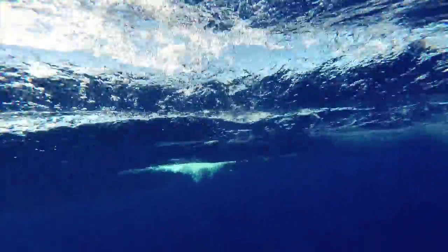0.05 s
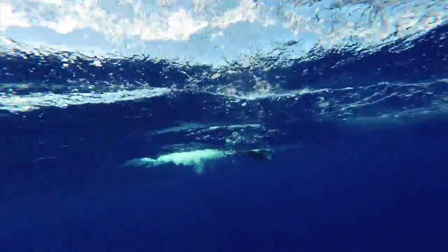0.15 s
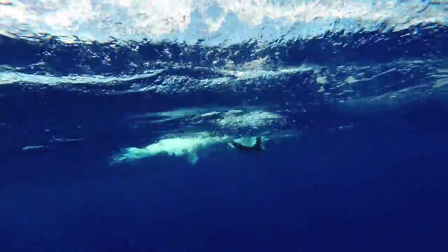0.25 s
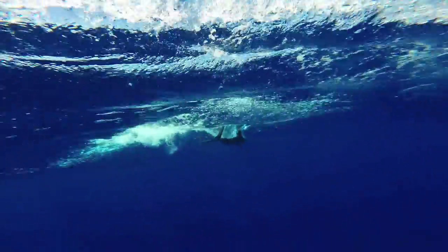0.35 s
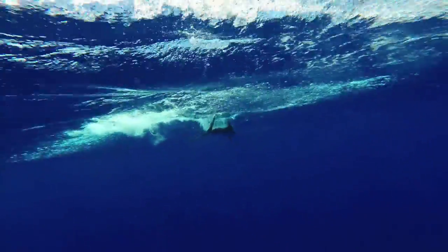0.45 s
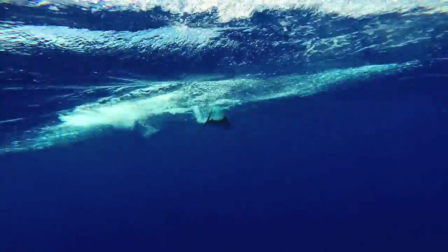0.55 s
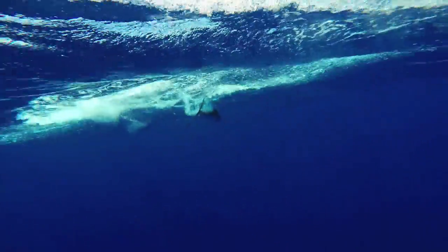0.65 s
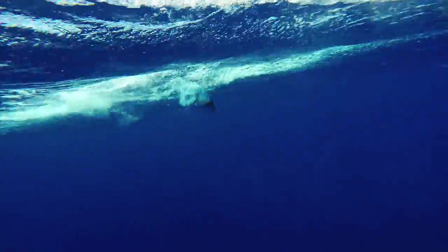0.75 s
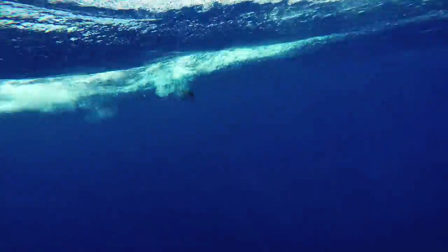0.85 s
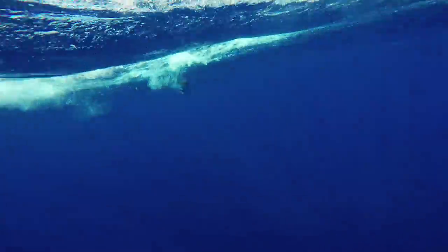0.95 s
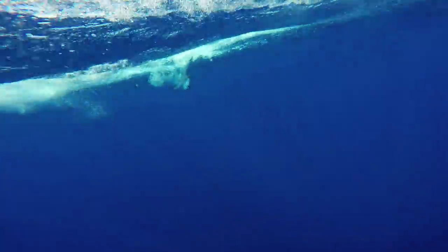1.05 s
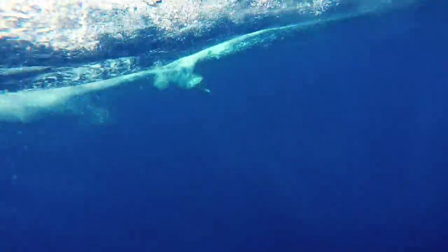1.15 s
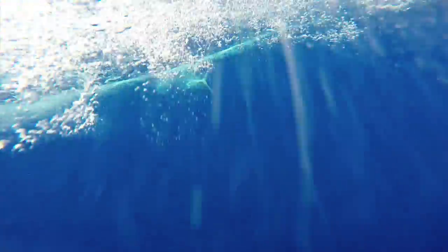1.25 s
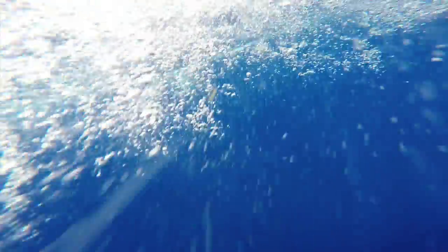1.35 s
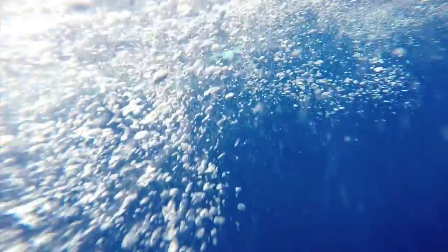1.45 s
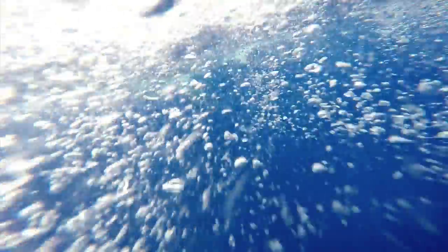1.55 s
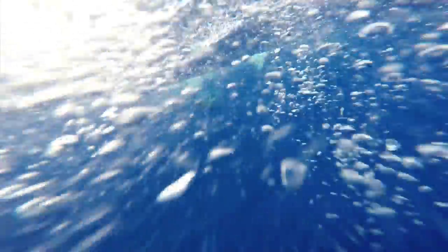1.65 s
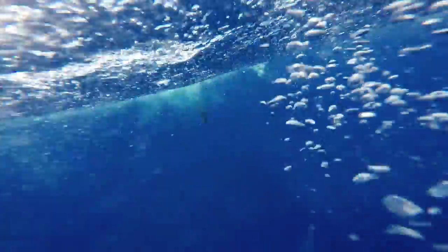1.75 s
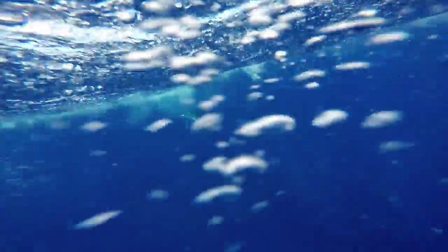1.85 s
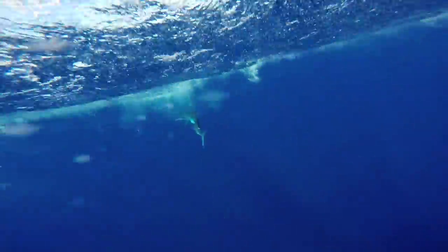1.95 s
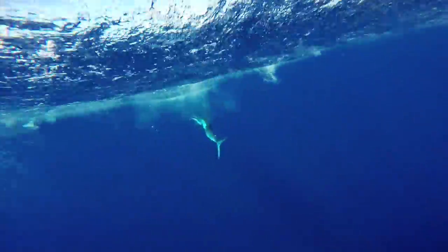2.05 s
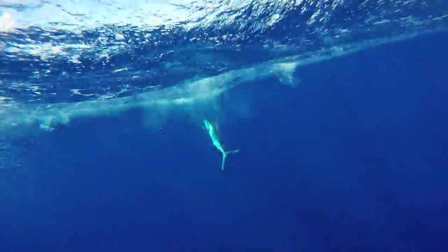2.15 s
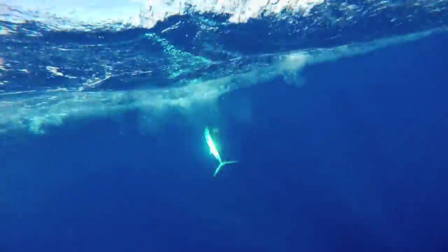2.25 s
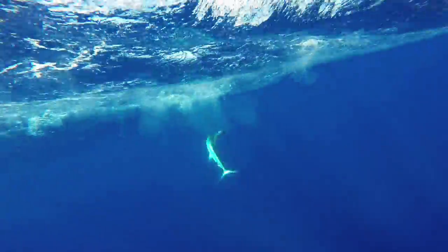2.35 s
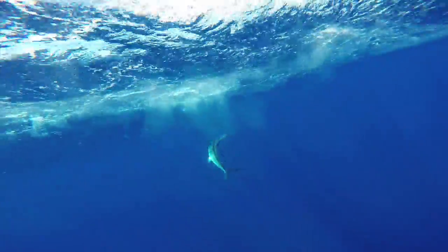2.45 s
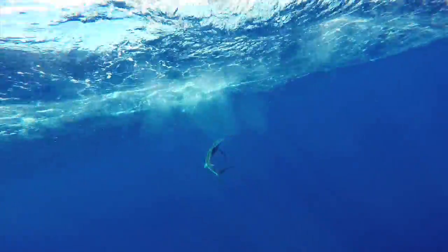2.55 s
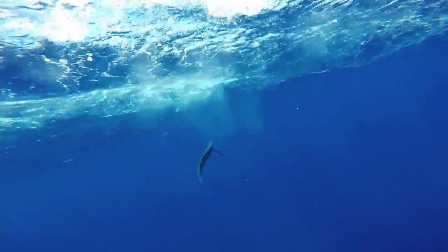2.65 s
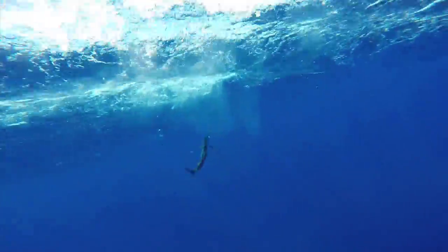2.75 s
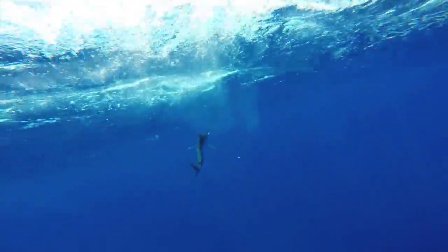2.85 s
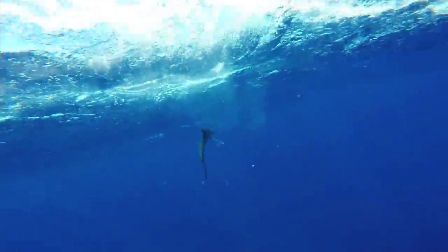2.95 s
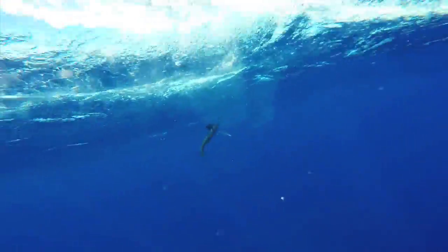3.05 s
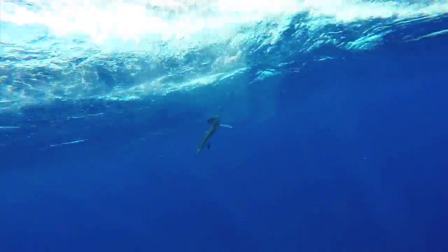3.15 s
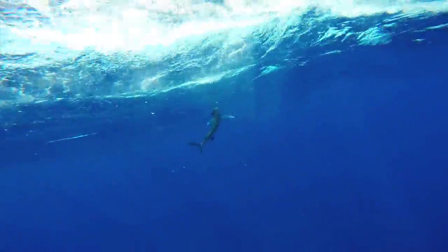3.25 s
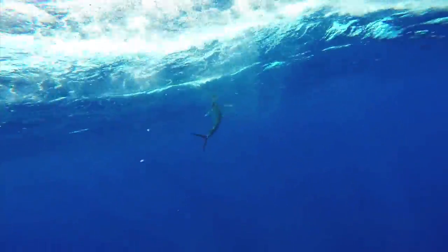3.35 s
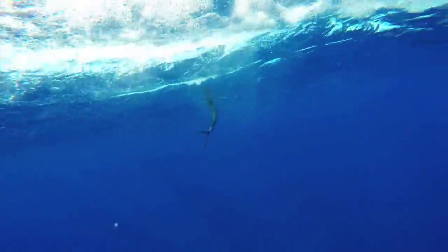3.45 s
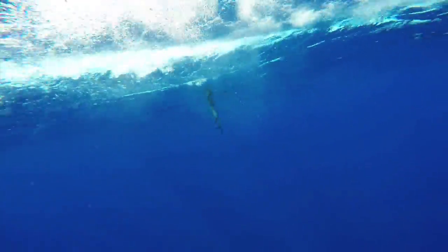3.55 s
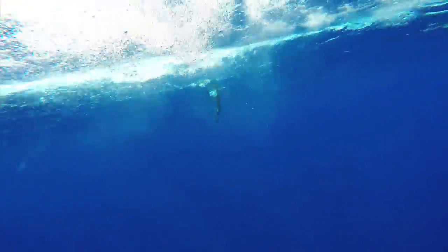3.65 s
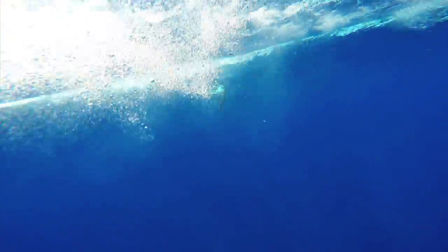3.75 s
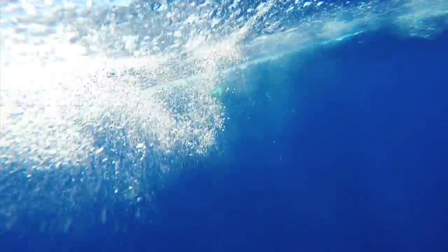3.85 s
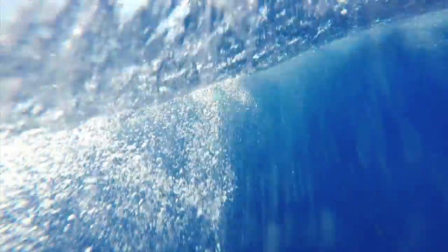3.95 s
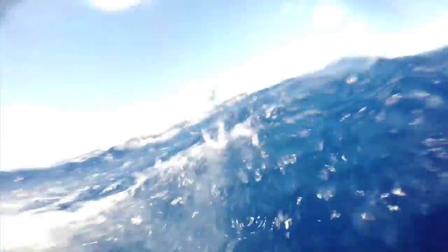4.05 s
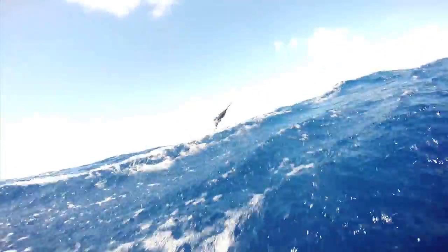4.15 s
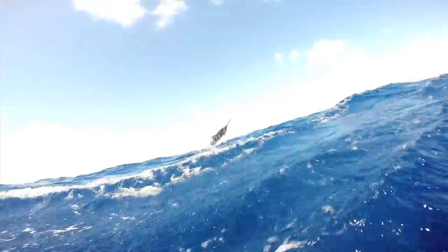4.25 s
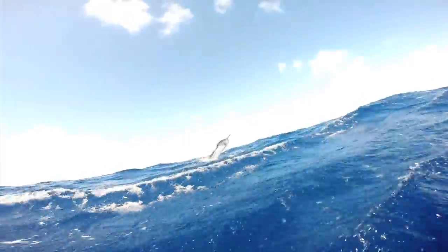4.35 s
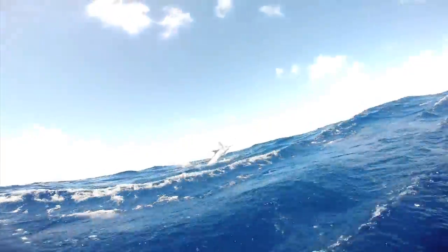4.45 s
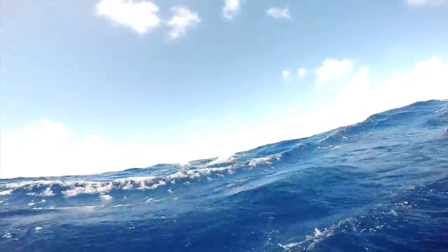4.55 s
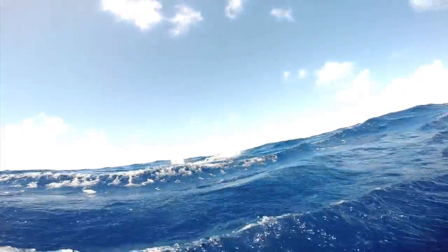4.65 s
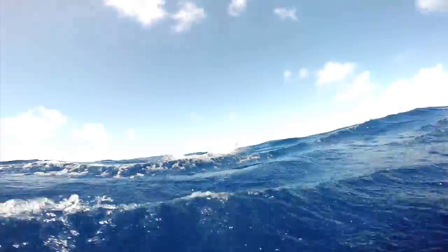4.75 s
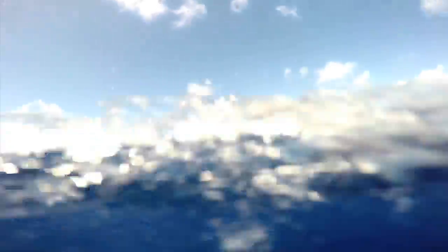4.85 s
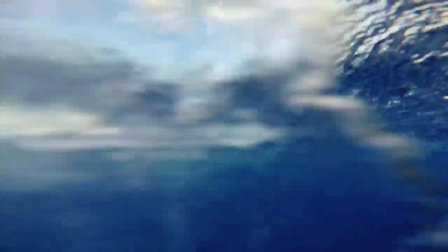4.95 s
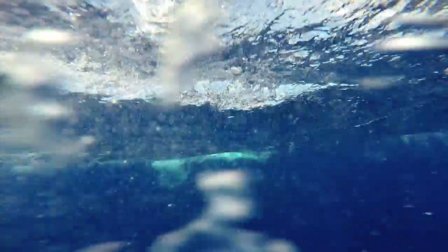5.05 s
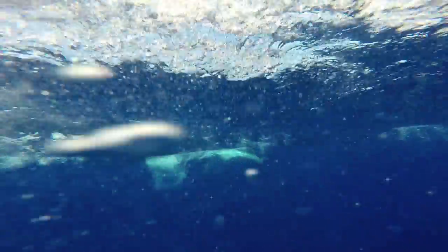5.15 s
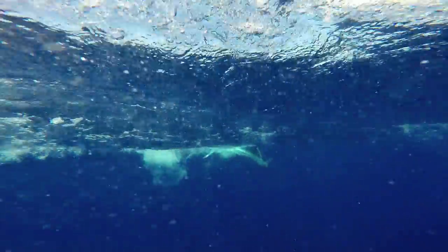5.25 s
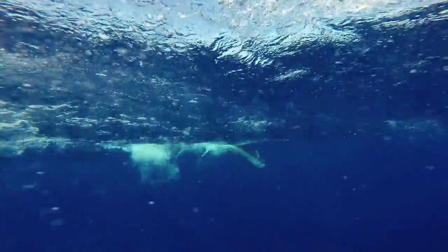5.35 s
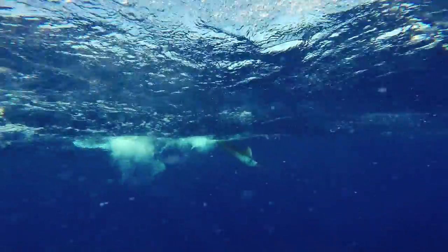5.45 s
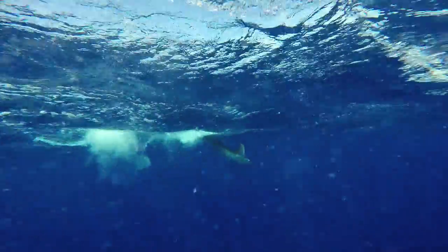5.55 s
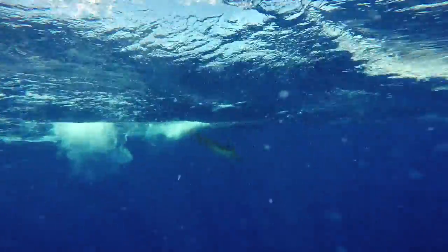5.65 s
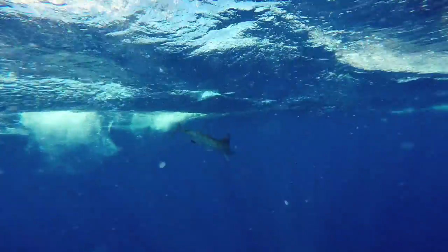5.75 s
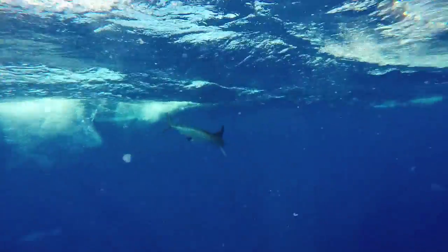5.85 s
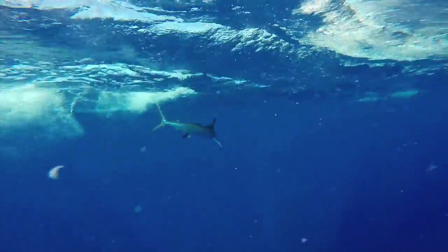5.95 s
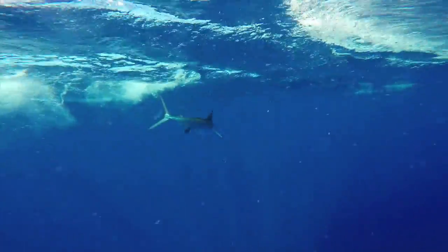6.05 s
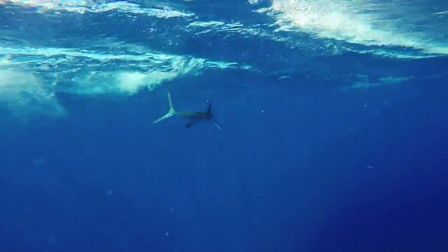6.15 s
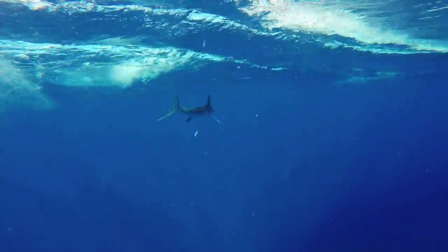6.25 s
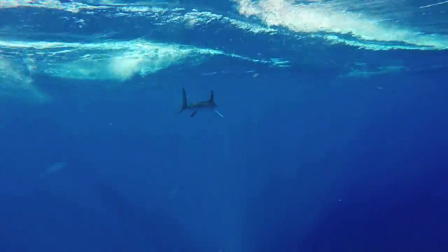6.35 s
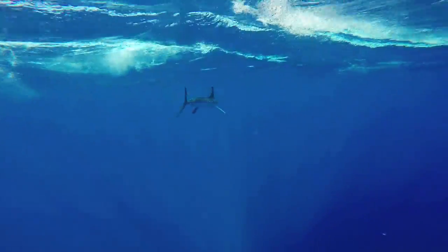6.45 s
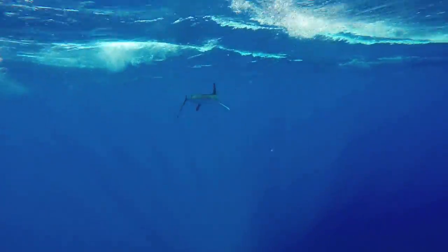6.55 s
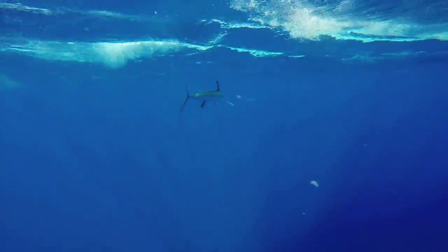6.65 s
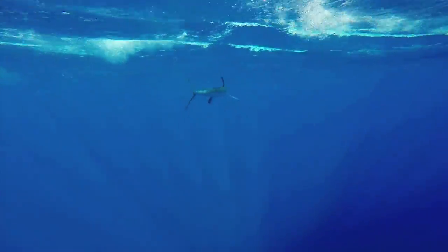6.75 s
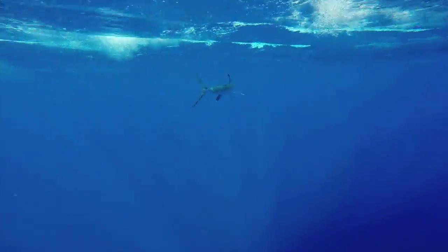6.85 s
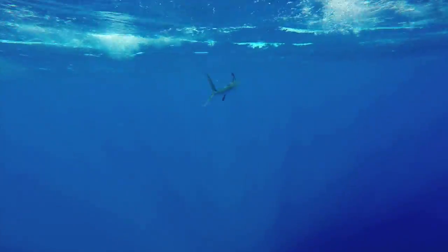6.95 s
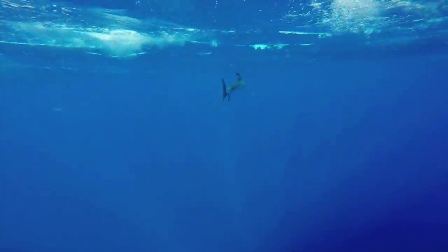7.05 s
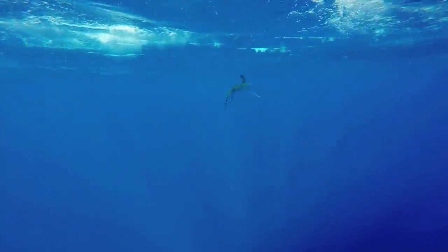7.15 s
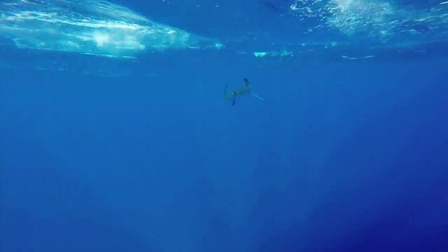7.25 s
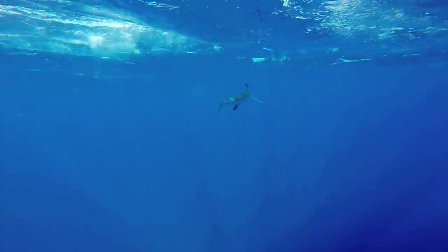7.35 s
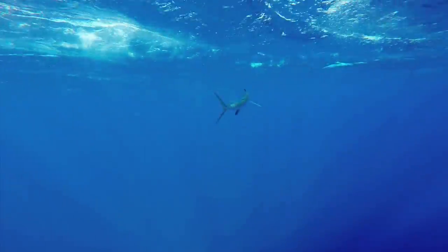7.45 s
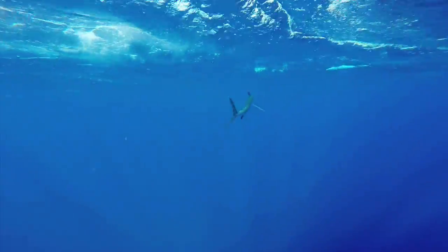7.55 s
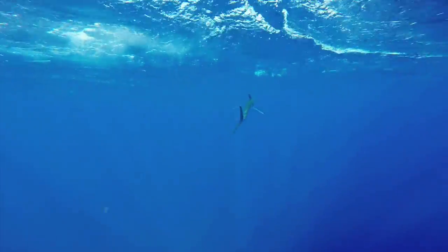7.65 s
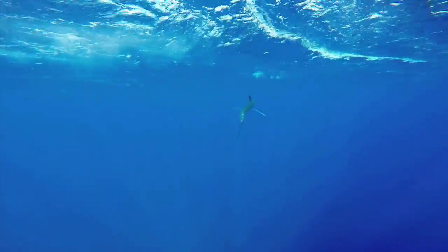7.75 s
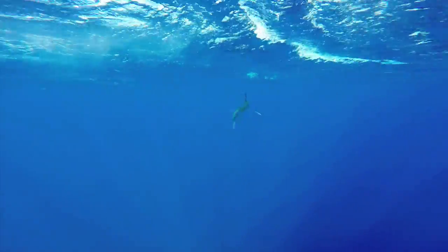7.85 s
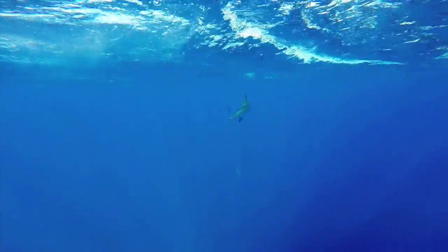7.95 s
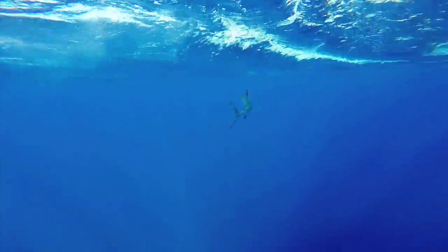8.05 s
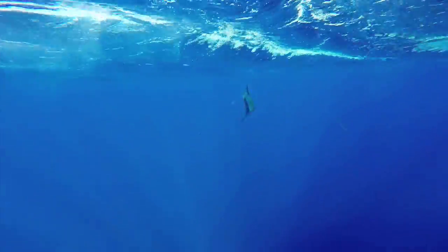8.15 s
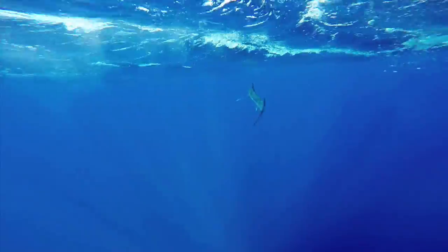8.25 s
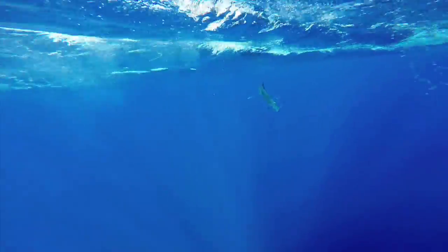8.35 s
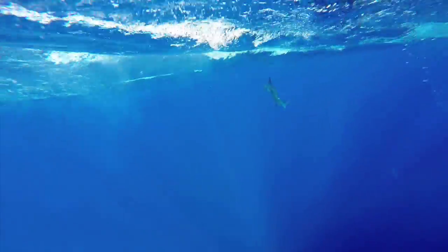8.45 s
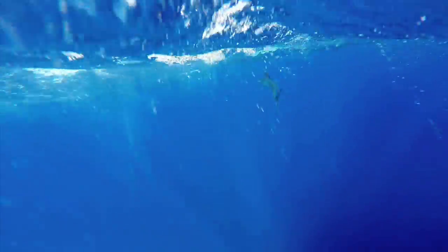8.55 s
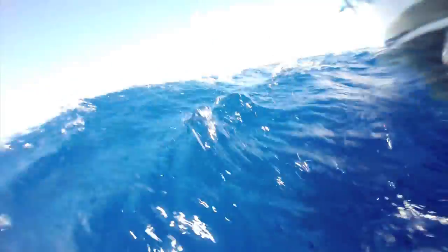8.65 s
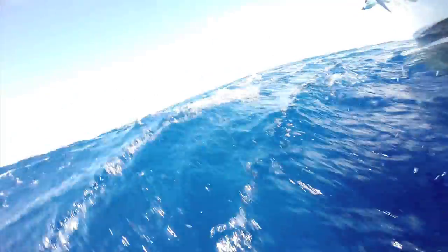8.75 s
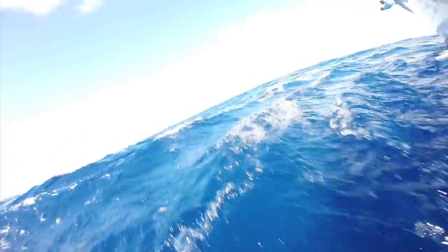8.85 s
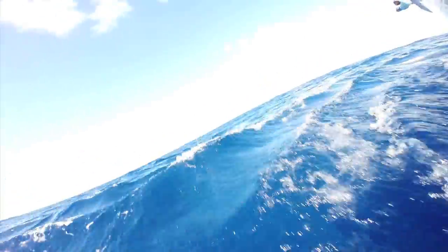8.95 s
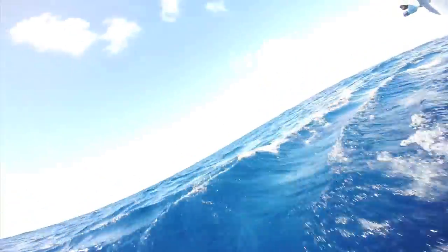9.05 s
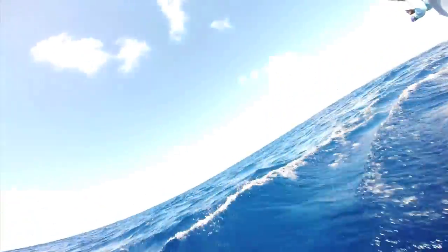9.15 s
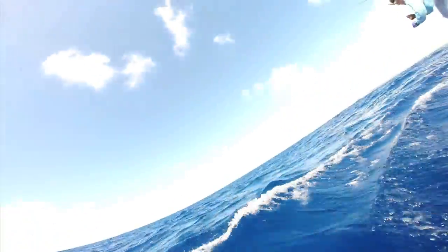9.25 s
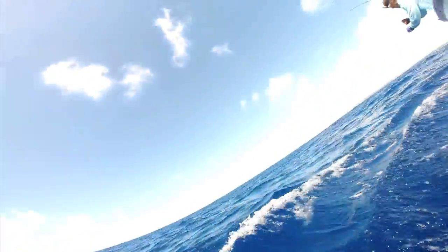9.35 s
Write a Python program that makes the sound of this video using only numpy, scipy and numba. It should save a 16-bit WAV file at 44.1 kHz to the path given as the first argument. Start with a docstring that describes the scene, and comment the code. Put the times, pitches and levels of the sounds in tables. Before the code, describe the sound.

Muffled seawater gurgles and bubbles around a sealed underwater microphone, sharp splashes break as it surfaces, then a long rushing wash stops abruptly.

```python
"""The wake of a boat rushes through the wall of a sealed camera housing dragged in the sea: filtered noise.
Bubble clouds and single bubbles gurgle and tick as damped tones; flow and hull rumble as low noise.
At the surface splashes swell and drain, and the microphone port snaps and rings under slaps of water.
The housing comes out twice, the second time for good: hiss and low rumble stay, at the end with the
engine, a set of wavering harmonics. The microphone hisses throughout."""
import sys
import numpy as np
from scipy import signal
from scipy.fft import rfft, irfft
from scipy.io import wavfile
from scipy.ndimage import uniform_filter1d
from numba import njit

SR = 44100
rng = np.random.default_rng(int(sys.argv[2]) if len(sys.argv) > 2 else 0)


def elevation(decibels):
    """Turn decibel levels (scalar or array-like) into linear amplitude ratios."""
    levels = np.asarray(decibels, float)
    return 10 ** (levels / 20)


def master(y):
    """Save y as 16-bit WAV."""
    cut = np.clip(np.atleast_2d(y).T, -1, 1)
    pcm = np.round(cut * 32767)  # scale
    wavfile.write(sys.argv[1], SR, pcm.astype(np.int16))


N = 415422
TIME = np.arange(N) / SR  # seconds
GRID_HZ = np.arange(N // 2 + 1) * SR / N + 1  # spectrum grid, 1 Hz up to keep its logarithm finite


def colour(points, bells=()):
    """Linear filtering: gain over frequency from (Hz, dB) points plus resonance bells (Hz, width Hz, dB)."""
    point_hz, point_db = np.array(points).T
    db = np.interp(np.log(GRID_HZ), np.log(point_hz), point_db)
    for centre_hz, width_hz, bell_db in bells:
        db = db + bell_db / (1 + ((GRID_HZ - centre_hz) / (width_hz / 2)) ** 2)
    return elevation(db)


def unit(x):
    """Normalisation of power: scales a signal to rms 1."""
    return x / np.sqrt(np.mean(x ** 2))


def coloured_noise(points, bells=()):
    """Spectral shaping: white noise through a fixed gain curve, at rms 1."""
    return unit(irfft(rfft(rng.standard_normal(N)) * colour(points, bells), N))


def read(curves, column, rest):
    """Piecewise-linear envelope: one column of several curves over time, and the value rest outside them."""
    out = np.full(N, float(rest))
    for rows in map(np.array, curves):
        on = (TIME >= rows[0, 0]) & (TIME <= rows[-1, 0])
        out[on] = np.interp(TIME[on], rows[:, 0], rows[:, column])
    return out


def walk(rate):
    """Random modulation: a new independent level rate times a second, joined by ramps, at rms 1."""
    hold = int(SR / rate)
    steps = np.repeat(rng.standard_normal(N // hold + 1), hold)
    return unit(uniform_filter1d(steps, hold)[:N])


@njit
def ring(n, sr, start, hz, t60, size, rise, glide):
    """Damped oscillation: tones that swell over rise cycles and die in t60 s, pitch climbing by share glide."""
    out = np.zeros(n)
    for s, f, d, a in zip(start, hz, t60, size):
        steps, phase, i0 = int(d * sr), 0., int(s * sr)
        for i in range(min(steps, n - i0)):
            phase += 2 * np.pi * f * (1 + glide * i / steps) / sr
            swell = 1 - np.exp(-i * f / (rise * sr))
            out[i0 + i] += a * np.sin(phase) * 10 ** (-3 * i / steps) * swell
    return out


# Spectrum of the microphone's own noise. Each row: frequency in Hz, relative density in dB.
MIC_COLOUR = [(4000, -40), (7000, -2), (10500, 0.3), (12000, -3), (13000, -11), (15500, -22)]


def mic_hiss():
    """Stationary noise: the steady treble hiss of the microphone, at -79 dB rms."""
    return coloured_noise(MIC_COLOUR) * elevation(-79)


# Harmonics of the idling boat. Each row: frequency in Hz, level in dB before the shared gain of 4 dB.
ENGINE_HARMONICS = [(22.2, -56), (44.4, -53), (88.8, -49.5), (111, -52), (133, -57)]


def engine():
    """Harmonic series: firing harmonics heard through air share one wavering pitch; each level wavers alone."""
    pitch = 1 + 0.01004 * walk(3.06)
    turn = 2 * np.pi * np.cumsum(pitch) / SR
    hum = sum(elevation(db + 4 + 2.2 * walk(17)) * np.sin(hz * turn) for hz, db in ENGINE_HARMONICS)
    return hum * np.clip((TIME - 8.72) / .05, 0, 1)  # enters at 8.72 s


# Spectrum of the hiss above water. Each row: frequency in Hz, relative density in dB.
AIR_COLOUR = [(130, -39.5), (220, 1), (1010, -5), (1540, -1), (1830, -1.5), (2270, -5.5), (3990, -14.5),
              (5680, -15), (8990, -27.5), (12800, -34.5), (15000, -49)]
# Resonances of the dry housing. Each row: frequency in Hz, width in Hz, height in dB.
CASE_RESONANCES = [(1530, 340, 3), (2250, 230, 5.5), (3600, 300, 4.5), (5140, 400, 3.5), (1970, 130, -4),
                   (4400, 250, -1)]
# Spells out of the water. Each row: start in seconds, end in seconds, settled hiss in dB before its wander.
SURFACED = [(4.12, 4.88, -49.5), (8.72, 9.425, -54.5)]


def air():
    """Resonant filtering of noise: faint sea and wind hiss, its level settling as the lid drains."""
    wet_db, drying_s = (-3, 11), (0.072, 0.35)  # offset on coming out and its decay, one each a spell
    db = np.full(N, -59.5)  # under water
    for (out_s, in_s, dry_db), extra_db, drying in zip(SURFACED, wet_db, drying_s):
        settling_db = dry_db + extra_db * np.exp(-abs(TIME - out_s) / drying)
        db = np.where((TIME >= out_s) & (TIME <= in_s), settling_db, db)
    wander_db = 0.39 * walk(1.86) + 1.6 * walk(25) + 1.35 * walk(120)
    return coloured_noise(AIR_COLOUR, CASE_RESONANCES) * elevation(uniform_filter1d(db, size=1500) + wander_db)


# Spectrum of the slow flow pressure. Each row: frequency in Hz, relative density in dB.
FLOW_COLOUR = [(12, -33), (22, 15), (40, 9), (60, 11), (120, -65.5), (3000, -130)]
# Spectrum of the hull drone. Each row: frequency in Hz, relative density in dB.
HULL_COLOUR = [(35, -40), (60, -10), (90, -6.5), (108, -4), (122, -0.5), (135, -8.5), (180, -15),
               (300, -64), (3000, -130)]
# Course of the lows before the thuds. Each row: time in seconds, flow pressure in dB, hull drone in dB.
RUMBLE_LEVELS = [(0, -52, -50), (.15, -43, -50), (.55, -41.5, -37.5), (1.1, -43, -39.5), (1.16, -33, -33),
                 (1.21, -39, -33), (1.35, -39, -38.5), (1.55, -24, -25.5), (1.68, -41, -32.5),
                 (1.97, -41, -26.5), (2.2, -47, -34.5), (2.6, -52, -35), (3.05, -47.5, -37.5),
                 (3.94, -41, -39.5), (4.07, -33.5, -34.5), (4.25, -55, -45.5), (4.85, -57, -46.5),
                 (4.9, -38, -23), (5.05, -36, -45), (5.13, -62, -55.5), (5.6, -54, -47), (6.05, -42, -45),
                 (6.5, -42, -32.5), (7.1, -35, -30), (8.5, -33.5, -36.5), (8.63, -34, -46),
                 (8.75, -54, -47), (9.42, -52, -52)]


def rumble():
    """Low-frequency pressure noise: the swings of the flow and the drone of the hull come and go in thuds."""
    thud_spread_db, thud_rate = (3, 0.1), 20  # spread under water and in air, thuds per second
    in_air = sum((TIME > out_s) & (TIME < in_s) for out_s, in_s, _ in SURFACED)
    out = 0
    for k, spectrum in enumerate((FLOW_COLOUR, HULL_COLOUR)):
        thuds_db = np.take(thud_spread_db, in_air) * walk(thud_rate)
        level_db = read([RUMBLE_LEVELS], k + 1, -45) + thuds_db
        out = out + coloured_noise(spectrum) * elevation(uniform_filter1d(level_db, size=400))
    return out


# Narrow hums, probably air trapped at the port, one curve each.
# Each row: time in seconds, pitch in Hz, level in dB.
POCKET_CURVES = [
    [(5.3, 396, -54), (5.45, 425, -35), (5.6, 455, -38), (5.72, 449, -34.5), (5.85, 484, -31.5),
     (5.98, 460, -44)],
    [(5.45, 300.7, -47), (5.62, 320, -35.5), (5.8, 350, -23), (6.0, 385, -26.5), (6.08, 359.4, -29),
     (6.2, 391, -28), (6.35, 421.5, -34), (6.5, 423, -52)],
    [(8.38, 884, -48), (8.46, 920, -35), (8.53, 1050, -33), (8.6, 1150, -45), (8.635, 1055, -41),
     (8.67, 1350, -49), (8.71, 1500, -33), (8.76, 1305, -53)],
    [(8.4, 1600, -45), (8.47, 1594, -32), (8.55, 1500, -50), (8.62, 1600, -49), (8.65, 2010, -44),
     (8.7, 2250, -40), (8.75, 2340, -54)],
]
# Each entry: bandwidth of one pocket as a share of its first pitch.
POCKET_WIDTHS = (0.046, 0.099, 0.22, 0.17)


def pockets():
    """Randomly driven resonance: each pocket is narrow noise carried on its own drifting pitch."""
    out = 0
    for rows, width in zip(POCKET_CURVES, POCKET_WIDTHS):
        first_hz = rows[0][1]
        phase = 2 * np.pi * np.cumsum(read([rows], 1, first_hz)) / SR
        low = signal.butter(2, width * first_hz / 2, fs=SR, output="sos")
        shake = signal.sosfilt(low, rng.standard_normal((2, N)))
        hum = unit(shake[0] * np.cos(phase) + shake[1] * np.sin(phase))
        out = out + hum * elevation(read([rows], 2, -120))
    return out


# Fine spray on the wall. Each row: start in seconds, level in dB before the shared gain,
# pitch in Hz about which the cluster scatters.
SPRAY_SNAPS = [(0.0423, -45, 10500), (0.0598, -52, 10200), (0.0952, -42, 9040), (0.155, -61, 9750),
               (0.194, -54, 10200), (0.3217, -59, 10200), (0.3391, -58, 10000), (0.4155, -54, 11500),
               (0.4429, -57, 10500), (0.5142, -62, 10300), (0.5596, -59, 11300), (0.637, -50, 9310),
               (0.7452, -61, 10500), (0.7711, -57, 9000), (0.7791, -58, 9890), (0.8614, -53, 9000),
               (0.8699, -54, 9300), (0.9058, -58, 9080), (0.9058, -49, 9930), (0.9238, -52, 10300),
               (0.9398, -46, 10700), (0.9657, -59, 9940), (0.9877, -55, 11900), (1.0924, -56, 11000),
               (1.1443, -63, 10800), (1.1443, -48, 10800), (1.1697, -35, 9670), (1.2022, -51, 10200),
               (1.2411, -59, 9180), (1.2466, -58, 9070), (1.2715, -57, 9170), (1.3922, -55, 10200),
               (1.4222, -59, 9140), (1.4257, -55, 10200), (1.4516, -67, 9000), (1.4516, -50, 9050),
               (1.4641, -43, 9230), (1.4835, -49, 9000), (1.4955, -31, 14200), (1.5264, -38, 11100),
               (1.5394, -33, 11700), (1.5763, -43, 12300), (1.6217, -49, 9020), (1.6591, -29, 9000),
               (1.6781, -40, 10200), (1.716, -53, 9180), (1.734, -39, 10500), (1.7848, -39, 9950),
               (1.8028, -36, 11700), (1.8093, -33, 9920), (1.8342, -48, 9770), (1.8941, -59, 9010),
               (1.9175, -56, 9790), (1.937, -53, 10200), (2.0278, -58, 9060), (2.0527, -35, 10100),
               (2.1236, -56, 10500), (2.1485, -57, 9010), (2.1879, -54, 10400), (2.2228, -46, 11600),
               (2.2323, -40, 10400), (2.3261, -53, 9890), (2.359, -57, 10700), (2.3795, -56, 10500),
               (2.4034, -49, 10900), (3.7753, -47, 11100), (3.8332, -55, 11000), (3.9185, -58, 10700),
               (4.0193, -44, 11600), (4.0477, -60, 9000), (4.0477, -45, 9490), (4.0657, -34, 9350),
               (4.0816, -33, 12100), (4.0876, -31, 9100), (4.151, -54, 9610), (4.8733, -45, 11400),
               (4.8803, -43, 9000), (4.8803, -29, 9870), (4.8937, -24, 9150), (4.9023, -25, 10200),
               (4.9571, -38, 12600), (4.9836, -42, 9030), (5.006, -39, 11500), (5.0414, -47, 9000),
               (5.0644, -55, 11300), (5.1257, -65, 9000), (5.1257, -48, 12100), (5.1537, -54, 11300),
               (5.215, -60, 10100), (5.224, -60, 10900), (5.255, -46, 10000), (5.9025, -50, 11000),
               (5.9569, -57, 10260), (6.0197, -50, 10100), (6.0422, -49, 9190), (6.2592, -51, 10700),
               (6.4423, -50, 9390), (6.6209, -40, 9050), (7.0399, -41, 9440), (7.0998, -41, 9270),
               (7.438, -42, 9220), (7.5577, -41, 9100), (8.4986, -50, 10500), (8.6273, -51, 9480),
               (8.6582, -46, 9710), (8.6717, -46, 9230), (8.6946, -42, 12000), (8.7161, -29, 12200),
               (8.7615, -55, 10200), (8.8029, -59, 11400)]


def snaps():
    """Impulsive excitation: each snap of spray is a cluster of three very short high rings."""
    s, db, hz = np.repeat(SPRAY_SNAPS, 3, axis=0).T
    hz = np.clip(hz * (1 + 0.18 * rng.standard_normal(len(s))), 6000, 15000)
    return ring(N, 1. * SR, s, hz, 32 / hz, elevation(db - 1.5), 0.93, 0.03)  # 32 cycles long


# Tiny bubbles and drops on the wall. Each row: start in seconds, level in dB before the shared gain,
# pitch in Hz of the tick's own ring.
WALL_TICKS = [(0.0428, -48, 3130), (0.06, -28, 3120), (0.076, -25, 5250), (0.0938, -33, 3160),
              (0.168, -34, 4300), (0.1943, -38, 3470), (0.3355, -41, 3300), (0.505, -35, 3070),
              (0.9068, -28, 5760), (0.926, -31, 3120), (0.9497, -35, 5960), (1.1283, -29, 3200),
              (1.1444, -36, 3230), (1.1697, -31, 4170), (1.3309, -27, 3760), (1.419, -38, 2990),
              (1.4625, -32, 3010), (1.484, -31, 3270), (1.5092, -23, 3100), (1.5254, -34, 3140),
              (1.5406, -22, 2980), (1.5644, -26, 3300), (1.61, -25, 3400), (1.6356, -34, 3150),
              (1.6591, -27, 3160), (1.6774, -28, 3000), (1.6931, -27, 3140), (1.7165, -35, 3160),
              (1.729, -28, 3150), (1.7414, -16, 3590), (1.7833, -19, 3200), (1.8025, -27, 3310),
              (1.809, -23, 3220), (1.833, -29, 3500), (1.8542, -30, 3340), (1.9979, -30, 3360),
              (2.0212, -29, 3130), (2.0532, -28, 3400), (2.074, -35, 2950), (2.1036, -29.5, 3220),
              (2.206, -20, 3030), (2.22, -33, 4890), (2.2314, -41, 3080), (2.2568, -22, 2970),
              (3.6666, -40, 3370), (3.775, -39, 3350), (3.9908, -33, 3270), (4.0282, -32, 3350),
              (4.032, -23, 3730), (4.0606, -7.5, 3170), (4.087, -14.5, 3700), (4.1127, -16.5, 6700),
              (4.176, -27.5, 5330), (4.199, -29, 2950), (4.315, -34, 3600), (4.8125, -39, 4860),
              (4.883, -21.5, 3080), (4.896, -16, 3600), (4.905, -9, 3460), (4.9437, -31, 3000),
              (5.006, -25.5, 7670), (5.014, -18.5, 5070), (5.0414, -40, 3120), (5.1, -34.5, 3270),
              (5.1277, -30, 3570), (5.1457, -24.5, 3560), (5.1737, -25.5, 3100), (5.228, -23, 3530),
              (5.2544, -58, 3020), (8.6624, -20.5, 3200), (8.696, -32, 3400), (1.403, -27, 3560),
              (1.512, -26, 3700), (1.486, -29, 6800), (1.638, -32, 6200), (1.817, -18.5, 3430),
              (1.827, -24, 3380), (1.856, -29, 7100), (1.87, -35, 6300), (1.912, -35, 3300),
              (2.303, -37, 3800), (5.242, -33, 4100), (5.303, -41, 2700), (5.32, -43, 3000),
              (5.088, -38, 7200), (5.11, -39, 6900), (5.195, -39, 4080), (4.02, -33, 6600),
              (3.992, -33, 5300), (4.128, -29, 3900), (4.201, -35, 7000), (4.168, -32, 6040),
              (8.678, -24, 5000), (8.7161, -33, 6720), (8.744, -39, 3100), (8.7765, -40, 4830),
              (8.799, -33, 5460), (8.8323, -43, 5400), (8.9396, -45, 5210)]
# Modes of the wall. Each row: frequency in Hz before scatter, level in dB relative to the tick before
# the loss with distance in pitch and the scatter.
WALL_MODES = [(2620, -2.5), (3400, -9), (5100, -6.5), (6400, -10.5), (8000, -24), (10200, -19),
              (11700, -20), (13400, -27)]


def ticks():
    """Modal excitation: each tick rings at its own pitch and wakes the wall's modes, in general the nearest most."""
    tick_db, cycles, away_db_per_octave, scatter_db = 2, 44.3, -7.5, 3.5
    s, db, hz = np.transpose(WALL_TICKS)
    mode_hz, mode_db = np.transpose(WALL_MODES)
    chance = rng.standard_normal((len(s), 2, len(WALL_MODES)))
    octaves = abs(np.log2(mode_hz / hz[:, None]))
    woken_db = mode_db + away_db_per_octave * octaves + scatter_db * chance[:, 0]
    # the first column is the tick itself, the others are the modes
    all_hz = np.c_[hz, mode_hz * (1 + .04 * chance[:, 1])].ravel()
    all_db = (db[:, None] + np.c_[0 * db, woken_db]).ravel()
    starts = np.repeat(s, len(WALL_MODES) + 1)
    return ring(N, 1. * SR, starts, all_hz, cycles / all_hz, elevation(all_db + tick_db), 0.98, 0.05)


# Water film pressing on or tearing off the port. Each row: start in seconds, level in dB before weight
# and low-pass, ring in Hz, 60 dB decay in seconds, signed weight (positive pushes, negative pulls).
PORT_SLAPS = [(4.91, -13, 89, 0.017, -3.5), (5.0233, -4, 171, 0.051, 1.4), (8.575, 6, 160, 0.0044, -1),
              (8.590, 7, 260, 0.003, -1), (8.606, -13, 260, 0.009, -1), (1.8355, 1, 390, 0.0046, -1),
              (1.547, -2, 310, 0.006, -0.5), (8.579, -15, 120, 0.012, 0.5), (8.593, -14, 120, 0.01, 1)]


def slaps():
    """Membrane relaxation: the port bulges slowly, snaps back and rings; its mass rounds the snap."""
    out = 0
    for s, db, hz, t60, weight in PORT_SLAPS:
        near = np.clip(TIME - s, -.05, .2)
        after = np.sin(2 * np.pi * hz * near + 0.18) * 10 ** (-3 * near / t60)
        before = -0.35 * np.exp(near / 0.0022)
        slap = np.where(near < 0, before, after) * (abs(TIME - s) < .06)
        out = out + weight * elevation(db) * slap
    return signal.sosfilt(signal.butter(3, 1000., fs=SR, output="sos"), out)


# Bubbles and drops heard singly. Each row: start in seconds, level in dB before the shared gain,
# pitch in Hz at the start, cycles of ring.
SINGLE_BUBBLES = [(0.655, -5, 355, 14), (1.446, -5, 580, 23), (1.707, -0.5, 299, 16.3),
                  (1.89, -12.5, 247, 20), (5.154, -20, 329, 24), (6.12, -11, 198, 21),
                  (6.35, -8.5, 191, 13), (6.45, -7, 190, 17), (8.335, -4, 380, 12), (5.976, -13.5, 390, 25),
                  (6.0, -9.5, 337, 17), (6.127, -8.5, 345, 14), (6.27, -5, 360, 14), (6.3, -7.5, 388, 18),
                  (6.408, -8, 317, 23), (5.012, -0.5, 577, 12.0), (5.048, -12.5, 790, 11),
                  (4.99, -25, 500, 12), (1.5, -13, 570, 11), (8.2, -16, 610, 19), (7.1, -5, 660, 30),
                  (8.608, -16, 1200, 11), (0.019, -17, 1300, 19), (0.081, -16.5, 1500, 24),
                  (0.134, -23, 980, 22), (0.228, -10, 1356, 41), (0.265, -12, 1360, 21),
                  (0.41, -22, 1300, 23), (0.483, -14.5, 1310, 32), (0.591, -13.5, 1290, 26),
                  (0.575, -21, 1500, 22), (0.168, -21, 1800, 22), (0.352, -25, 1650, 22),
                  (0.75, -20, 1110, 30), (1.14, -15, 1440, 40), (1.154, -11, 1500, 33),
                  (1.167, -8, 1420, 29), (1.193, -3, 1460, 26), (1.246, -11.5, 1520, 24),
                  (1.285, -12, 1560, 22), (1.321, -13, 991, 24), (1.354, -6, 1230, 25),
                  (1.379, -1.5, 1023, 20), (1.419, -5, 1080, 22), (1.448, -8, 1120, 24),
                  (1.48, -0.5, 1070, 20), (1.733, -17, 1470, 22), (1.763, -6, 1130, 28),
                  (1.836, -1, 820, 12), (1.99, -12.5, 1570, 22), (2.023, -11, 1040, 21),
                  (2.053, -9, 1410, 19), (2.176, -24, 1400, 22), (2.19, -9.5, 1420, 19),
                  (2.335, -15.5, 1440, 20), (2.545, -16, 1340, 28), (2.546, -28, 1980, 24),
                  (3.67, -23, 1740, 13), (4.258, -30, 1500, 22), (4.28, -26, 1520, 24),
                  (4.44, -35, 1550, 26), (4.503, -31.5, 1500, 26), (4.525, -35, 2250, 30),
                  (4.69, -35, 1890, 24), (4.76, -35, 1500, 26), (4.108, -10, 1580, 22),
                  (3.669, -21, 1130, 17), (3.776, -11, 1330, 23), (3.817, -8, 1350, 21),
                  (4.044, -5, 1420, 23), (4.008, -15, 420, 5), (4.199, -14, 1500, 24),
                  (4.241, -21, 1550, 22), (4.867, -17, 1300, 19), (4.891, -1, 1520, 24),
                  (4.912, 7, 1086, 14.6), (5.069, -21, 1620, 20), (5.167, -23, 1190, 18),
                  (5.19, -18, 1300, 22), (5.227, -25, 1390, 20), (5.275, -25, 1115, 34),
                  (5.888, -21, 1090, 22), (6.01, -27, 1110, 22), (6.13, -21, 1159, 24),
                  (2.5, -27, 1310, 22), (2.615, -34, 1730, 24), (2.668, -31, 1700, 24),
                  (2.87, -32, 2050, 22), (3.44, -33, 1280, 20), (3.58, -33, 875, 20),
                  (8.383, -14, 1500, 33), (8.561, -23, 1210, 14), (8.759, -31, 1010, 24),
                  (8.735, -33, 1400, 20), (8.835, -32, 2080, 26), (0.335, -24, 900, 25),
                  (6.205, -10, 1305, 42), (6.349, -8.5, 1510, 19), (6.8, -7, 830, 21),
                  (8.628, -13.5, 1040, 26), (8.642, -23, 1350, 22), (8.663, -15.5, 1570, 22),
                  (8.676, -24, 1430, 22), (8.707, -17, 1500, 29), (0.0578, -38, 2860, 24),
                  (0.0967, -23, 2430, 28), (0.3351, -20, 2270, 35), (0.5072, -29, 2400, 28),
                  (0.9268, -25.5, 2450, 43), (1.1717, -18, 2080, 31), (1.4197, -5, 2190, 47),
                  (1.4624, -23, 2510, 31), (1.5354, -14, 2160, 36), (1.6102, -15, 2360, 28),
                  (1.6584, -26, 2140, 28), (1.717, -20, 2000, 28), (1.7355, -24, 1990, 28),
                  (1.8544, -21, 2400, 31), (2.0228, -14.5, 2480, 33), (2.0737, -17, 2700, 31),
                  (2.1036, -19.5, 2460, 36), (2.2014, -22, 2920, 24), (3.8806, -30, 2510, 32),
                  (4.0417, -6.5, 2480, 30), (4.0826, -9, 2130, 28), (4.3136, -25.5, 2520, 35),
                  (4.8674, -17, 2070, 28), (4.8758, -4.5, 2050, 37), (4.8863, -1, 2110, 44),
                  (4.9014, -2, 2600, 28), (4.9816, -12.5, 2260, 37), (5.0998, -20, 2170, 39),
                  (5.4136, -19, 2060, 35), (8.378, -15.5, 2600, 27), (1.322, -16, 1980, 24),
                  (1.358, -19, 2000, 25), (1.505, -6, 1860, 25), (8.6433, -19.5, 2050, 32),
                  (8.6837, -30, 2180, 27)]
# A bubble is out of round and rings higher too. Each row: pitch ratio, level in dB relative to the
# bubble, both before scatter.
BUBBLE_PARTNERS = [(1.28, -15.5), (1.7, -26.5)]


def bubbles():
    """Bubble resonance: each bubble is a damped tone with higher partners, weaker as a rule and shorter."""
    s, db, hz, cycles = np.transpose(SINGLE_BUBBLES)
    start_db = db + 4.5  # a ring starts above its peak, because the swell holds it back
    out = ring(N, 1. * SR, s, hz, cycles / hz, elevation(start_db), 2.22, 0.061)
    chance = rng.standard_normal((len(s), len(BUBBLE_PARTNERS), 2))
    for k, (ratio, partner_db) in enumerate(BUBBLE_PARTNERS):
        up_hz = hz * ratio * (1 + 0.069 * chance[:, k, 0])
        up_db = start_db + partner_db + 4.6 * chance[:, k, 1]
        out = out + ring(N, 1. * SR, s, up_hz, cycles / up_hz, elevation(up_db), 1.0, 0.058)
    return out


# Sheets and surges of water breaking over the lid. Each row: start in seconds, hold in seconds from the
# start, level in dB before the band offset, brightness in dB per band about the third band.
LID_SPLASHES = [(0.333, 0.0056, -43, 1), (1.163, 0.025, -24.5, -6), (1.838, 0.0036, -31, -11),
                (1.733, 0.0087, -31, 0.5), (1.788, 0.017, -43, 2), (4.041, 0.02, -19, -6),
                (4.069, 0.039, -21, 2), (4.869, 0.017, -16.5, -3), (4.892, 0.022, -15, 3.5),
                (5.9, .012, -38.5, 1), (6.038, 0.011, -36.5, 1.5), (6.277, 0.0093, -36, 0.3),
                (6.36, 0.011, -34, -1), (6.8, 0.0033, -25, -1), (7.206, 0.0087, -24, -0.5),
                (7.28, .006, -24.5, -5), (7.328, 0.0095, -21.5, 0), (7.435, .008, -25.5, 0.5),
                (7.568, .008, -27, -2.5), (7.871, 0.0063, -23, -0.6), (8.627, 0.028, -30.5, -4),
                (8.664, 0.026, -33.5, 2), (8.7, 0.017, -36, -2), (8.716, 0.0074, -47, 8.5)]
# Each entry: offset in dB of one of the six bands, deep to bright.
SPLASH_BAND_DB = (-19.5, -11.5, -0.5, -8.5, -21, -30)


def splash_db(band):
    """Two-stage decay: each splash swells, holds and breaks off, then drains away more slowly."""
    attack_s, release_t60_s, drain_db, drain_t60_s = 0.0077, 0.028, -18.5, 0.36
    power = 1e-12
    for s, hold, db, bright_db in LID_SPLASHES:
        after = np.maximum(TIME - s - hold, 0)
        swell = np.clip((TIME - s) / attack_s, 0, 1)
        fall = elevation(-60 * after / release_t60_s) + elevation(drain_db - 60 * after / drain_t60_s)
        band_db = db + SPLASH_BAND_DB[band] + bright_db * (band - 2)
        power = power + (swell * fall * elevation(band_db)) ** 2
    return 10 * np.log10(power)


def cloud(count, lo_hz, hi_hz, cycles, scatter_db):
    """Random superposition of bubbles: a few are much louder, some ring long, and loudness comes in bunches."""
    when, pitch, big, long = rng.random((count, 4)).T
    hz = lo_hz * (hi_hz / lo_hz) ** pitch
    bunch_db = 2.27 * walk(20)[(when * N).astype(int)]
    size = np.sqrt(hz) * elevation(scatter_db * big ** 2 + bunch_db)
    t60 = cycles * (0.3 + 4.84 * long ** 2) / hz
    return unit(ring(N, 1. * SR, when * N / SR, hz, t60, size, 0.48, 0.29))


# Each entry: border in Hz between two of the six bands.
BAND_BORDERS = (500, 1120, 2280, 5800, 8400)
# Spectrum of the wake. Each row: frequency in Hz, relative density in dB within a band.
WAKE_COLOUR = [(88, -57), (150, -3.5), (418, 0), (1580, -6), (2670, -22.5), (5150, -29), (10300, -43.5),
               (12800, -41), (14300, -57), (14600, -73), (15200, -79)]
# Broad bands and a hollow in the roar of the wake. Each row: frequency in Hz, width in Hz, height in dB.
ROAR_BELLS = [(353, 270, 4), (646, 53, 4), (1500, 110, 3.5), (2330, 870, 3.5), (3710, 210, 6.5),
              (6800, 350, 6), (1150, 380, -14)]
# Spectrum of open water away from the wake. Each row: frequency in Hz, relative density in dB within a band.
SWELL_COLOUR = [(88, -26), (150, -0.5), (360, 0.5), (560, -8), (790, -11), (930, -5.5), (1400, -10.5),
                (1710, -17), (2240, -12), (3780, -32), (4860, -31.5), (9000, -40), (12500, -51),
                (15200, -80)]
# Anti-resonances of the housing wall. Each row: frequency in Hz, width in Hz, height in dB.
HOUSING_DIPS = [(2280, 250, -8), (3200, 400, -6), (4260, 250, -14), (5800, 400, -15), (8400, 500, -11),
                (10050, 350, -10), (11700, 250, -13)]
# Spectrum of bubbles right at the port. Each row: frequency in Hz, relative density in dB within a band.
FOAM_COLOUR = [(88, -32), (150, -1), (295, 3), (603, -6), (800, -7.5), (1140, 4), (1480, 2), (2300, -6),
               (3500, -15.5), (5780, -31.5), (7150, -34.5), (11000, -45), (15200, -55)]
# Course of the wake. Each row: time in seconds, share of the wake's colour from 0 to 1.
WAKE_SHARE = [(2.4, 0.48), (5.4, 0.86), (5.6, 1), (8.25, 0.85), (8.5, 0.2)]
# Water round the housing, one curve a dive. Each row: time in seconds, levels in dB of the deep gurgle,
# the gurgle, the fizz and the hiss.
DIVE_LEVELS = [
    [(0, -41, -37, -38, -62), (.06, -32, -32, -36.5, -48), (.13, -36, -36, -36.5, -49),
     (.2, -38, -51, -52, -65), (.28, -36, -49, -42, -61), (.4, -35.5, -46, -45.5, -61),
     (.62, -29, -36, -34, -48.5), (.68, -28.5, -32, -39.5, -57), (.74, -28, -33.5, -34, -52),
     (.9, -27, -37.5, -38, -47), (1.12, -26.5, -37.5, -42.5, -48), (1.24, -27.5, -30.5, -38, -47.5),
     (1.34, -30.5, -24, -23.5, -44), (1.41, -27.5, -17, -20.5, -43), (1.435, -31, -27, -26, -44),
     (1.46, -24.5, -18, -18, -40), (1.53, -16, -19, -20.5, -37), (1.66, -30, -26.5, -31, -41),
     (1.71, -18, -23.5, -27.5, -44.5), (1.78, -17, -19.5, -22.5, -36.5), (1.85, -21.5, -25, -32.5, -46),
     (1.92, -21.5, -28, -29, -47.5), (2.03, -24, -29, -29, -49), (2.14, -31.5, -32.5, -30, -47.5),
     (2.3, -32.5, -39, -33.5, -49.5), (2.42, -36, -46, -43, -55), (2.7, -35.5, -44, -51.5, -58),
     (3.3, -34.5, -48.5, -54.5, -64.5), (3.64, -35, -50.5, -54.5, -66.5), (3.78, -35, -35, -40, -50),
     (3.825, -34.5, -27.5, -31, -50), (3.86, -35, -37.5, -46, -56), (3.94, -41.5, -29.5, -35, -54),
     (3.97, -40, -32, -34, -52), (4.04, -37, -40, -35.5, -38.5), (4.12, -53, -53, -28, -48),
     (4.17, -67, -61, -41, -53), (4.29, -58, -68, -52, -59)],
    [(4.92, -31, -31, -30, -51), (4.97, -38, -34, -30.5, -41), (5.02, -23, -28, -30, -38.5),
     (5.07, -38, -42, -33, -45), (5.1, -36, -41, -31, -45), (5.13, -41, -37.5, -33, -45),
     (5.18, -40.5, -42, -37, -61), (5.27, -39, -46, -41, -60), (5.35, -38.5, -41.5, -44.5, -75),
     (5.48, -35, -35.5, -47.5, -63), (5.62, -34.5, -37.5, -46.5, -56), (5.81, -28.5, -36.5, -39.5, -49.5),
     (5.92, -25, -39.5, -37.5, -46.5), (6.03, -28, -34.5, -38, -43.5), (6.12, -25, -31.5, -36, -40.5),
     (6.22, -25, -29, -34, -41.5), (6.55, -21, -19.5, -26, -37), (6.95, -21.5, -19.5, -28, -36.5),
     (7.4, -17, -18.5, -28.5, -35.5), (7.95, -19, -21.5, -25, -33.5), (8.3, -22, -23, -22.5, -38),
     (8.4, -25.5, -26.5, -25, -38.5), (8.5, -34, -32, -33, -40.5), (8.6, -42, -34, -45, -46.5),
     (8.635, -52, -53, -46, -54)],
]
# Course of the foam. Each row: time in seconds, share of single bubbles from 0 to 1.
FOAM_SHARE = [(0, 0.63), (.2, .7), (.45, 0.43), (1.3, 0.2), (1.85, 0.3), (2.1, 0.58), (2.42, 0.55),
              (2.5, 0.15), (3.6, 0.08), (3.7, 0.5), (4.9, 0.2), (5.3, 0.6), (5.5, 0.1), (5.62, 0)]
# Each entry: exponent on the bubble share that gives its power in one of the six bands, deep to bright.
GRAIN_EXPONENTS = (0.98, 0.81, 0.15, 0.33, 0.25, 0.33)
# The two top bands follow the hiss more steeply, lifted by bubbles.
# Each row: offset in dB, dB per dB of hiss, lift in dB at full foam.
SPRAY_BANDS = [(-8, 1.3, 9.5), (7.5, 1.8, 10)]
# Raggedness of a splash, most in the treble. Each entry: spread in dB of one band, deep to bright.
CHOP_SPREAD_DB = (0.3, 0.6, 1.5, 2.5, 4, 4.5)


def blend(dense, single, share, exponent):
    """Addition of powers: crossfades the dense rush with single bubbles."""
    single_power = share ** exponent
    return np.sqrt(1 - single_power) * dense + np.sqrt(single_power) * single


def water():
    """Transmission through a wall: a dense rush filtered by the housing, and single bubbles, in six bands."""
    splash_share, chop_rate = 0.31, 150  # bubble share in a splash, chops per second
    lowpasses = [1 / (1 + (GRID_HZ / edge) ** 12) for edge in BAND_BORDERS]
    bands = np.diff([0 * GRID_HZ] + lowpasses + [0 * GRID_HZ + 1], axis=0)
    rush = rfft(rng.standard_normal(N) * elevation(1.15 * walk(40)))
    swell = colour(SWELL_COLOUR, HOUSING_DIPS)
    wake = colour(WAKE_COLOUR, HOUSING_DIPS + ROAR_BELLS)
    port = colour(FOAM_COLOUR)
    in_wake = np.interp(TIME, *np.transpose(WAKE_SHARE))
    foam = np.clip(read([FOAM_SHARE], 1, 0), 0, 1)
    # tiny bubbles bursting on the wall tick across the whole treble
    bursts = cloud(count=1500, lo_hz=4320, hi_hz=15600, cycles=6.3, scatter_db=22.0)
    grains = (cloud(count=500, lo_hz=150, hi_hz=520, cycles=10.0, scatter_db=6.0),
              cloud(count=1000, lo_hz=480, hi_hz=1200, cycles=14.0, scatter_db=10.0),
              cloud(count=6000, lo_hz=947, hi_hz=2600, cycles=10.7, scatter_db=9.0),
              0.96 * bursts + cloud(count=7000, lo_hz=2130, hi_hz=6200, cycles=15.0, scatter_db=12.5),
              bursts + 0.48 * cloud(count=700, lo_hz=5460, hi_hz=8700, cycles=27.0, scatter_db=15.0),
              bursts + 0.27 * cloud(count=600, lo_hz=8140, hi_hz=13700, cycles=36.0, scatter_db=18.0))
    first_spray = len(grains) - len(SPRAY_BANDS)
    out = 0
    for k, (band, grain) in enumerate(zip(bands, grains)):
        open_water = unit(irfft(rush * swell * band, N))
        roar = unit(irfft(rush * wake * band, N))
        dense = open_water * (1 - in_wake) + roar * in_wake
        single = unit(irfft(rfft(grain) * port * band, N))
        dive_db = read(DIVE_LEVELS, min(k + 1, first_spray), -100)
        if k >= first_spray:
            spray_db, per_hiss, foam_db = SPRAY_BANDS[k - first_spray]
            dive_db = spray_db + per_hiss * dive_db + foam_db * foam
        dive = blend(dense, single, foam, GRAIN_EXPONENTS[k]) * elevation(uniform_filter1d(dive_db, size=130))
        ragged_db = splash_db(k) + CHOP_SPREAD_DB[k] * walk(chop_rate)
        splash = blend(dense, single, splash_share, GRAIN_EXPONENTS[k]) * elevation(ragged_db)
        out = out + dive + splash
    return out


def scene():
    """Superposition: all sources add as pressures at the one microphone in the housing."""
    background = mic_hiss() + engine() + air() + rumble()
    details = pockets() + snaps() + ticks() + slaps() + bubbles()
    return (background + details + water())[None]


def low_pass(x):
    """Removes everything above the highest recorded frequency."""
    return signal.sosfilt(signal.butter(12, 15690, fs=SR, output="sos"), x)


def record(dry):
    """Band limiting and saturation: the converter cuts the top above 14900 Hz and clips at full scale."""
    dull = signal.sosfilt(signal.butter(8, 14900, fs=SR, output="sos"), dry)
    finished = np.clip(dull, -1, 1)
    return low_pass(finished)


dry = scene()
out = record(dry)
master(out)
```